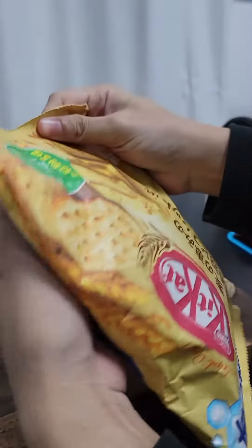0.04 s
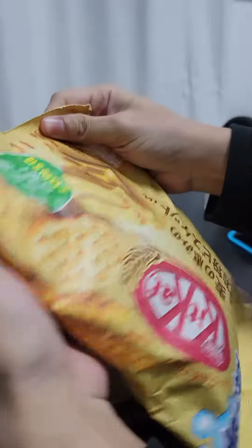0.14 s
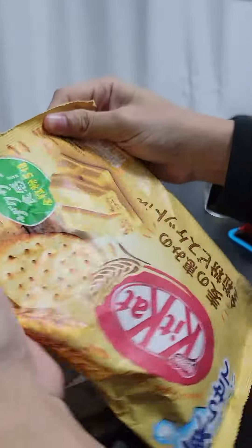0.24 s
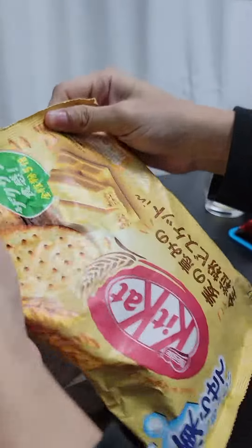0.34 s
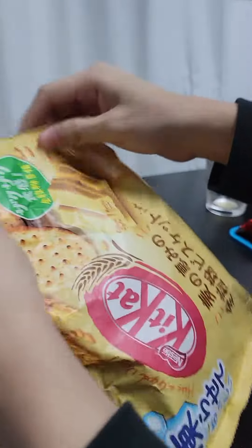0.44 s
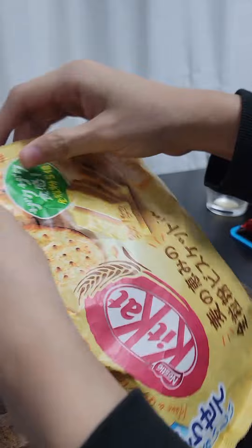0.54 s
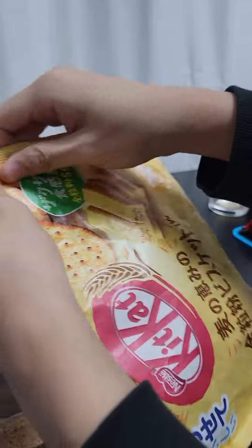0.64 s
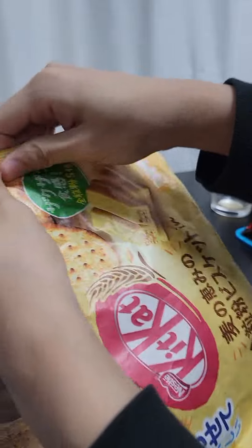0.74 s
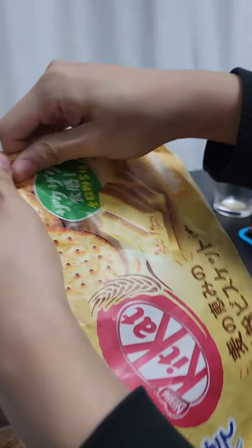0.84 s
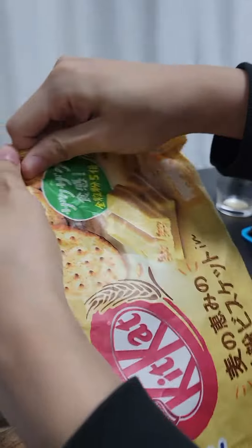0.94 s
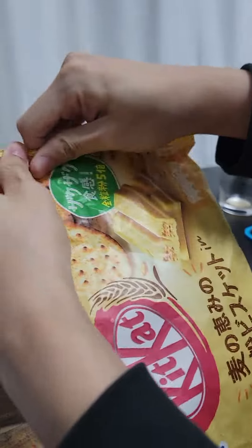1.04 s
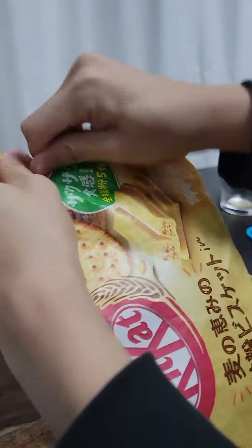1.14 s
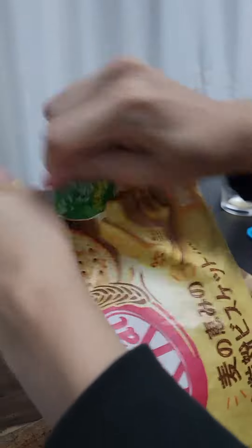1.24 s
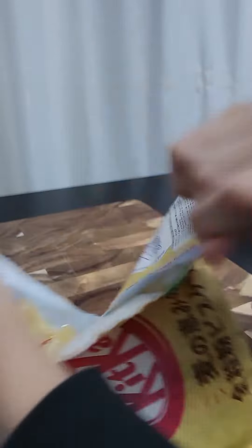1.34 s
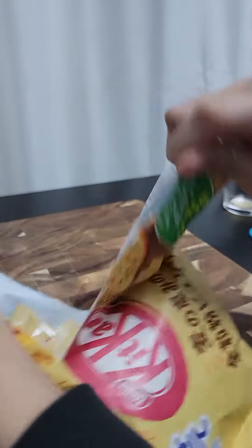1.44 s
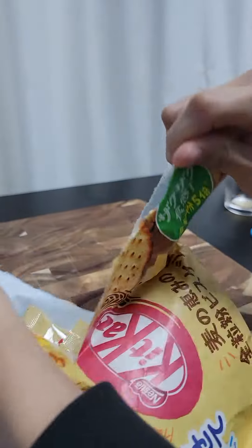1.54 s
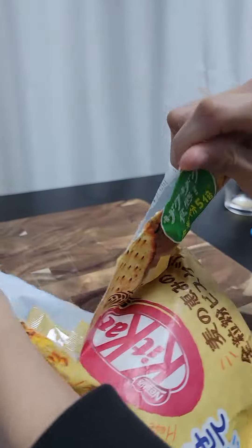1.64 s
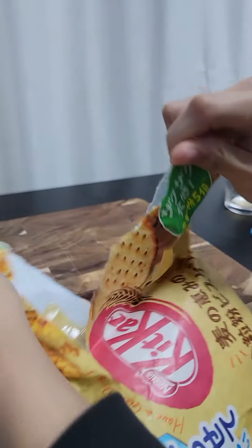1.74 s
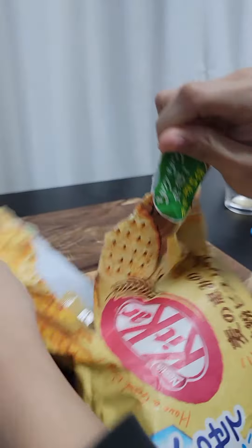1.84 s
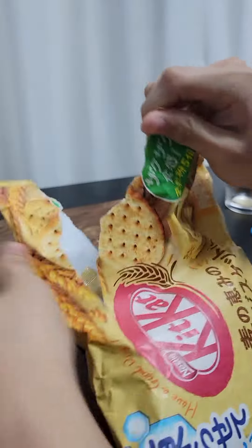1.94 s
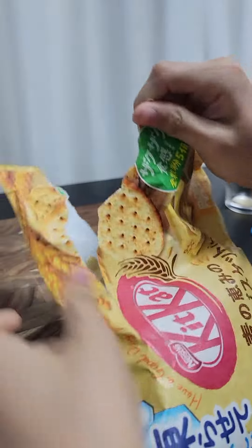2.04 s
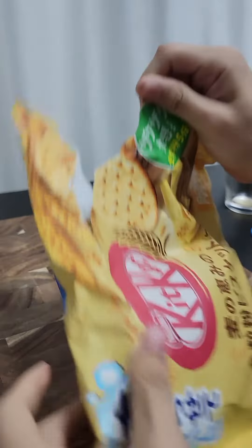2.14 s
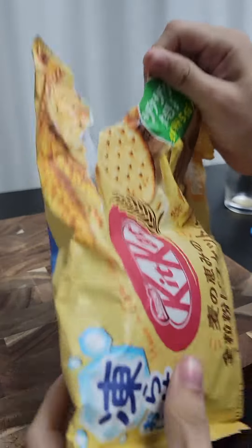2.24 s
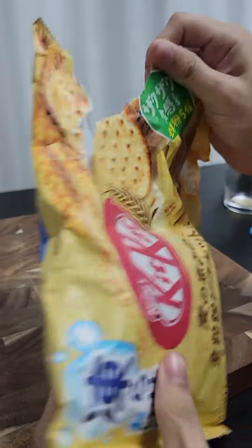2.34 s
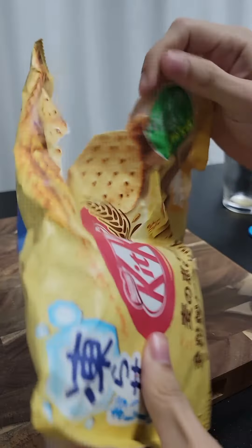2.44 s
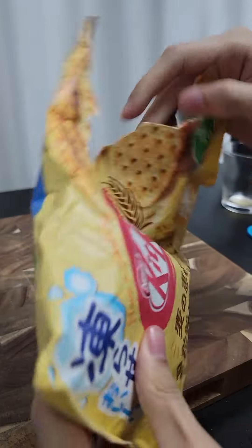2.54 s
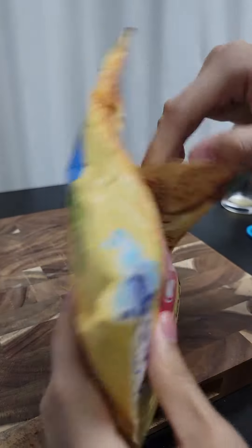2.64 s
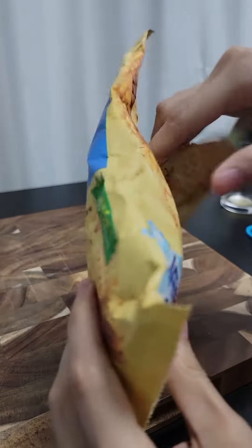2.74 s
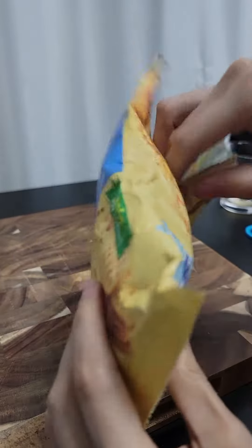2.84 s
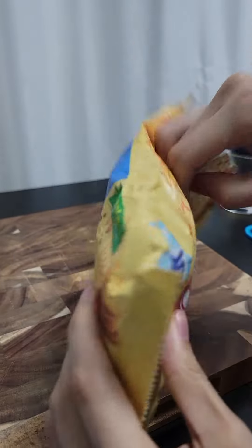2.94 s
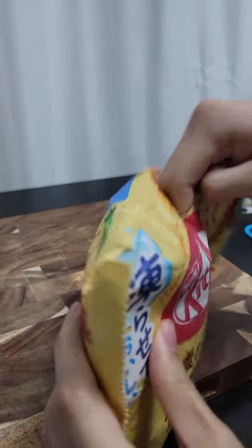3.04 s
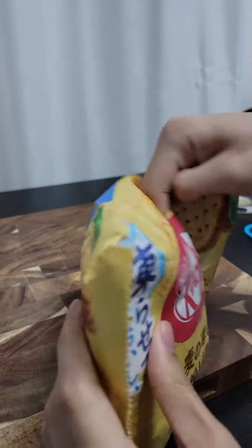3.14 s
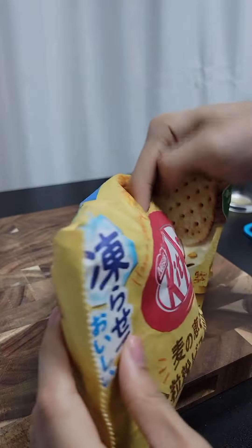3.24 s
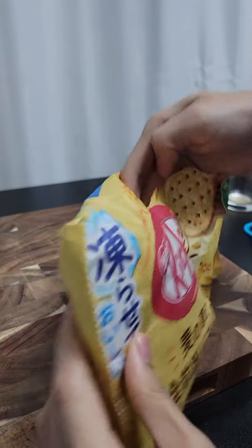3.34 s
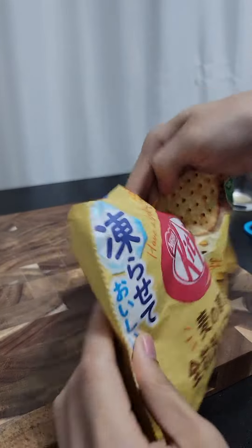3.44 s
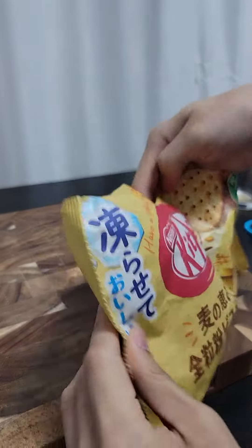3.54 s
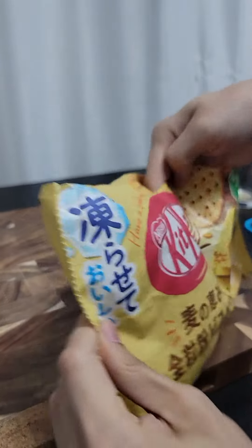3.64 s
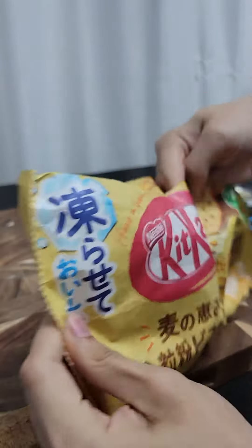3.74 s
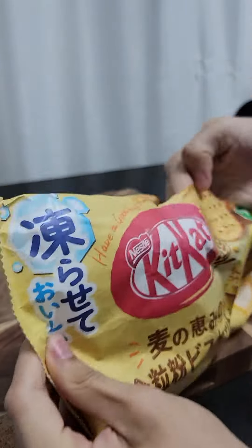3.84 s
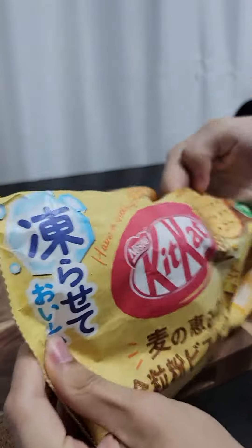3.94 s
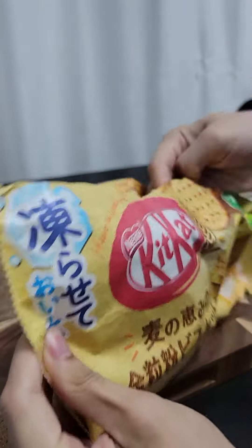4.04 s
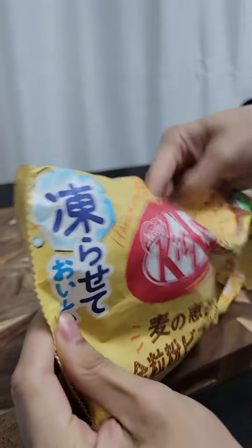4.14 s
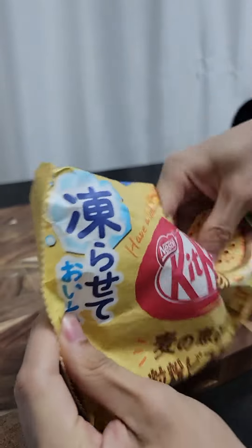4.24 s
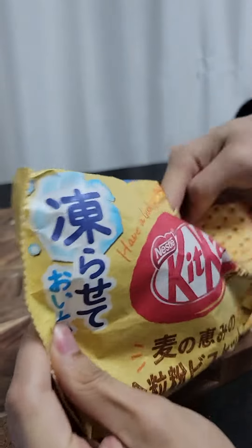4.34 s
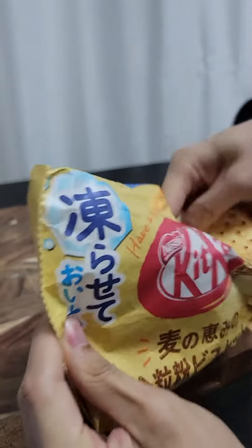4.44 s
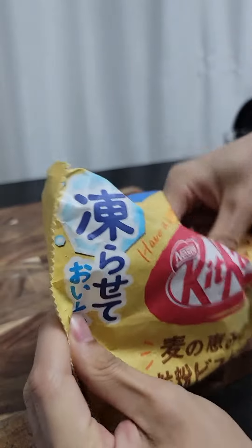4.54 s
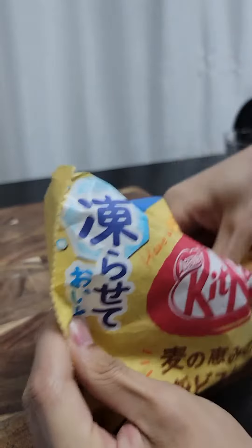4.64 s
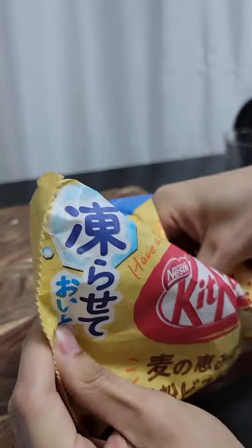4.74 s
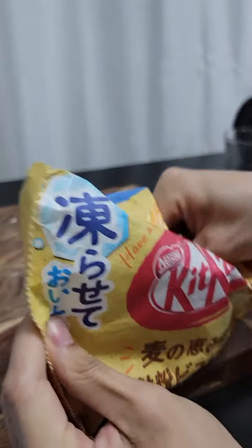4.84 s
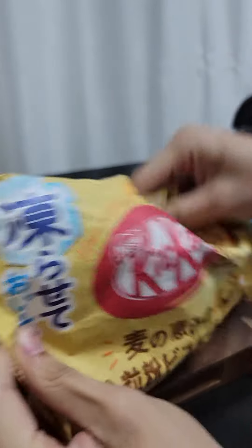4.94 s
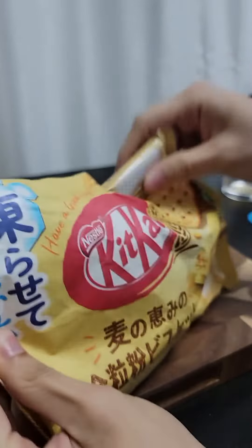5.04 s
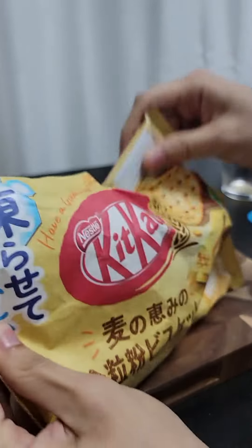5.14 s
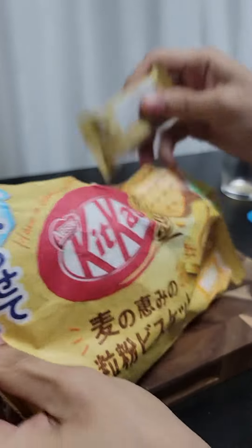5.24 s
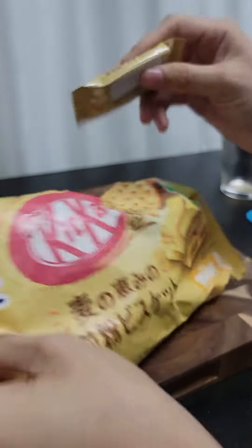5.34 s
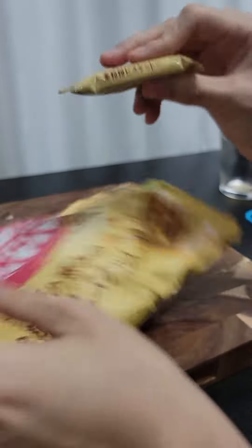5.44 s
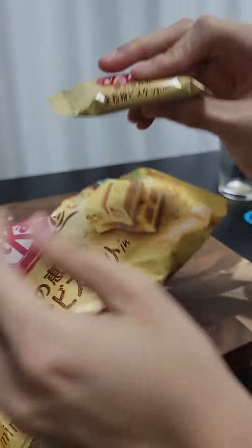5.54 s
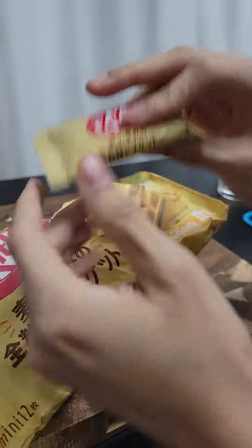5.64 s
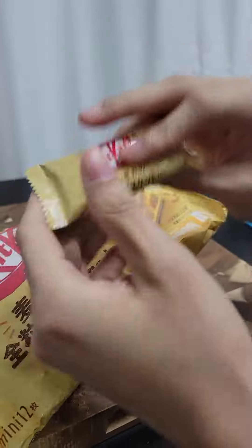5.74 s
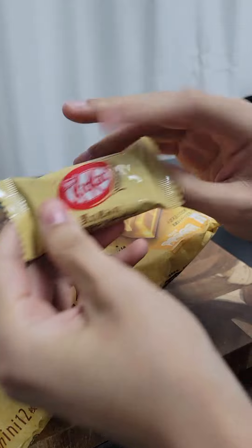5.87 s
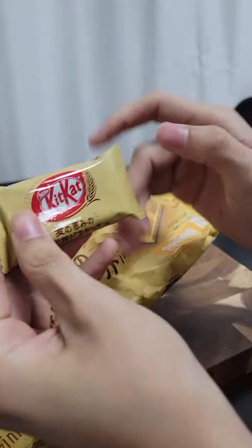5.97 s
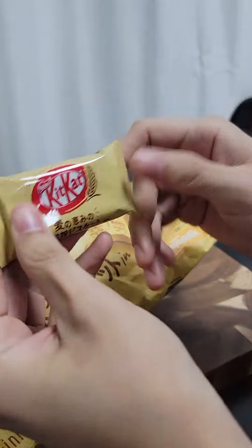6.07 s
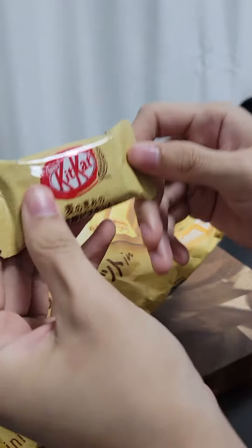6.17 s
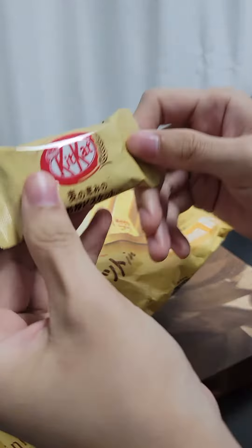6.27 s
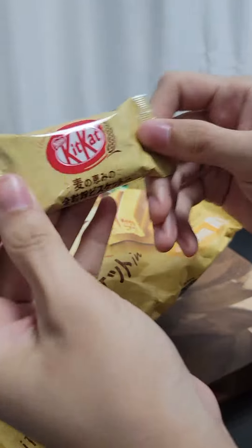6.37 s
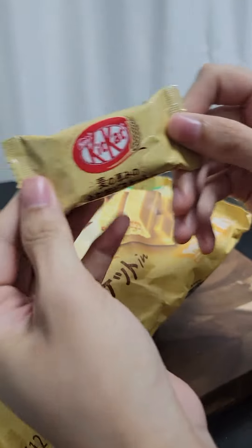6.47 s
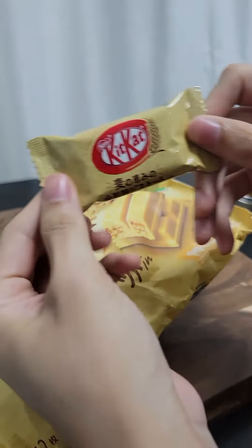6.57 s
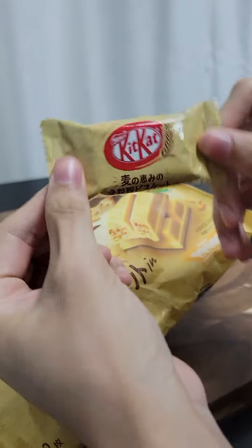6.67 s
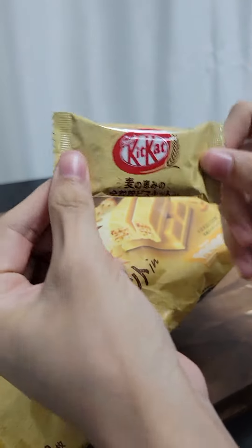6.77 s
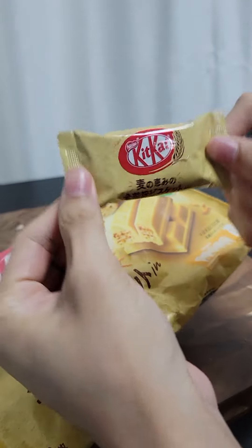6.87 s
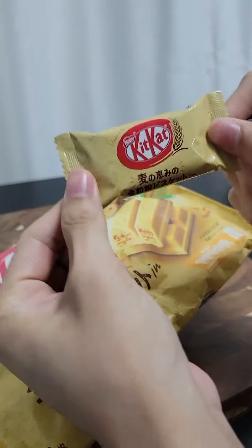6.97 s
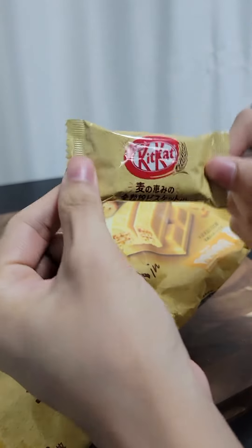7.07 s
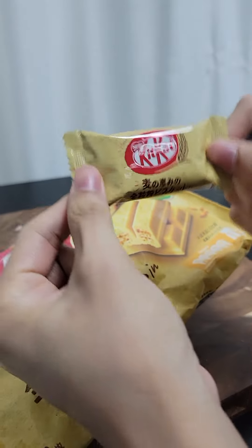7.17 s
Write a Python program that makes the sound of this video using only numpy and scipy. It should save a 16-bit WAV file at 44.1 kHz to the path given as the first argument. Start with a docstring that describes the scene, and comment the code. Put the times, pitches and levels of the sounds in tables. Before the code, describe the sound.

Hands handle a puffy film bag over a table: faint dry sliding and sparse crinkles, a run of evenly spaced snaps growing louder, then a violent ripping crack with a low thump. Loose film rustles gently, then crackles strongly as fingers dig around. The bag is dropped with a dull bump, and a small wrapped bar crinkles crisply and thinly. Close stereo pickup, short room reflections, low hum beneath.

```python
"""Snack bag ripped open

Hands rip open a plastic snack bag over a table, close to a phone, then rummage in it and turn over a small wrapped bar.
Creases in the film buckle one by one (snaps) or in swarms of kicked and rubbed facets (rustle, rip).
The bag thuds softly when it is bumped, and fingertips hiss over its film.
A small, quiet room with a low hum answers; peaks past full scale flatten, as in overloaded microphones."""
import sys
import numpy as np
from scipy import signal
from scipy.fft import rfft, irfft
from scipy.io import wavfile
from scipy.ndimage import uniform_filter1d

SR = 44100
rng = np.random.default_rng(int(sys.argv[2]) if len(sys.argv) > 2 else 0)


def output_pcm(signal):
    """Save a mono or channel-first signal as 16-bit PCM at the path in sys.argv[1].

    Samples are clipped to [-1, 1] before scaling.
    """
    pcm = np.clip(np.atleast_2d(signal).T, -1, 1) * 32767
    wavfile.write(sys.argv[1], SR, np.round(pcm).astype(np.int16))


N = 317961
TIME = np.arange(N) / SR
CONTROL_TIME = TIME[::64]  # slower clock for the movements of the hands
TAPS = 1024  # samples in one crease
BINS = np.fft.rfftfreq(TAPS, 1 / SR)

# Spectral colour of a single crease in the bag. Each row: frequency in Hz, relative level in dB.
BAG_FILM = [(60, -32.5), (130, -1), (400, -10), (600, -3), (750, 1), (950, -4.5), (1250, -2), (1700, -8),
            (3800, -6), (7000, -10.5), (10900, -22.5), (14500, -12.5), (16000, -26)]
# Spectral colour of massed rustling film. Each row: frequency in Hz, relative level in dB.
RUSTLE_COLOUR = [(50, -34.5), (120, 7.5), (330, -7), (430, -11), (740, 2), (980, -5.5), (1200, -1.5),
                 (1700, -2.5), (3600, -3.5), (7000, -8.5), (8500, -13.5), (11000, -21), (14400, -13.5),
                 (16000, -18)]


def gain_of(db):
    """Decibels to an amplitude factor."""
    return 10 ** (np.asarray(db) / 20)


def evened(x):
    """Scaled to rms 1."""
    return x / np.sqrt(np.mean(x ** 2) + 1e-20)


def read(points, hz):
    """A table of (Hz, value), interpolated on a log-frequency axis."""
    f, value = np.transpose(points)
    return np.interp(np.log(hz + 1), np.log(f + 1), value)


def add(mix, s, sound):
    """Mixes a sound in at time s, in seconds."""
    part = mix[:, max(round(s * SR), 0):][:, :sound.shape[-1]]
    part += sound[..., :part.shape[1]]


def panned(db):
    """Left and right gains of constant power; positive dB favours the left."""
    return evened(gain_of([[db / 2], [-db / 2]]))


def causal(gain):
    """The minimum-phase spectrum with this gain: it starts at once and then rings out."""
    log_gain = np.log(np.maximum(gain / gain.max(), 1e-5))
    circle = np.concatenate([log_gain, log_gain[-2:0:-1]])
    return np.exp(np.conj(signal.hilbert(circle)))[:len(gain)]


def stroke_power(rows, attack_s, release_s, sag_db):
    """Power of each stroke over time: it swells up to its start, holds with a steady drift in level, and dies away."""
    start, length, db = np.transpose(rows)[:3, :, None]
    t = CONTROL_TIME - start
    edges = np.minimum(np.minimum(t / attack_s, (length - t) / release_s), 0)
    level = gain_of(db - sag_db * np.clip(t / length, 0, 1))
    return (level * np.exp(edges)) ** 2


def effort(rows, attack_s, release_s, sag_db, held=((0, -100),), held_bright_db=0):
    """Strokes on top of a held level, as (s, level dB, brightness dB); stronger strokes weigh more in the brightness."""
    power = stroke_power(rows, attack_s, release_s, sag_db)
    rest = gain_of(np.interp(CONTROL_TIME, *np.transpose(held))) ** 2
    total = power.sum(0) + rest
    bright_db = (np.transpose(rows)[3] @ power + held_bright_db * rest) / total
    work = np.transpose([CONTROL_TIME, 10 * np.log10(total), bright_db])
    return work[total > 1e-9]


def crease(film, hz, octaves, flutter, flutter_s, lag_s, rise_s=0.000069):
    """One facet of film starts to give, flips, then flutters as the bend spreads; it reaches one microphone first."""
    flip = 60  # sample of the flip
    t = (np.arange(TAPS) - flip) / SR
    swell = evened(np.exp(np.minimum(t / rise_s, -t / flutter_s))) / np.sqrt(TAPS)
    shared, left, right = rng.standard_normal((3, TAPS)) * swell
    same = 1 / (1 + (BINS / 900) ** 2)  # long waves reach both microphones alike
    shake = same * rfft(shared) + np.sqrt(1 - same ** 2) * rfft(np.array([left, right]))
    kick = rng.choice([-1, 1]) * rfft(t == 0)
    facet = (1 + (np.log2((BINS + 1) / hz) / octaves) ** 2) ** (-3 / 4)
    colour = causal(gain_of(read(film, BINS)) * facet)
    late_samples = np.round(np.maximum([[-lag_s], [lag_s]], 0) * SR)
    delay = np.exp(-2j * np.pi * BINS * late_samples / SR)
    wave = irfft((kick + flutter * shake) * colour * delay)
    return wave / np.sqrt((wave ** 2).sum(1, keepdims=True))


def snaps(rows, film, level_db, flutter, flutter_s, rise_s, width, lag_s):
    """Single creases, each with the energy of 5 ms at its level; the nearer microphone is louder and earlier."""
    out = np.zeros((2, N))
    for s, db, hz, octaves, side_db in rows:
        size = (2000 / hz) ** 0.7  # large, low facets move slowly; small ones are crisp
        lag = lag_s * np.tanh(side_db / 3)
        wave = crease(film, hz, octaves * width, flutter, flutter_s * size, lag, rise_s * size)
        add(out, s - .001, gain_of(db + level_db) * panned(side_db) * wave * np.sqrt(SR / 200))
    return out


def crackle(work, film, per_s, spread_db, rub, wander_db, octaves, flutter_s, side_db, count=52):
    """Facets of film are kicked by small creases and rubbed by sliding skin; which ones answer shifts as it folds."""
    s, db, bright_db = np.transpose(work)
    t = np.arange(max(s[0], 0), s[-1], 1 / SR)
    folds = np.arange(t[0], t[-1] + .1, 1 / 30)
    lags = rng.permutation(np.linspace(-1, 1, count)) * .00042
    grip = gain_of(0.087 * (np.interp(t, s, db) - db.max()))  # a harder grip creases more against the rub
    swarm = np.zeros((2, len(t)))
    for hz, lag_s in zip(np.geomspace(250, 16000, count), lags):
        chance = rng.random(len(t)) * count * SR / per_s
        at = np.flatnonzero(chance < 1)
        kicks = np.zeros(len(t))
        kicks[at] = gain_of(spread_db * np.minimum(-np.log(chance[at]), 4)) * (-1) ** at  # few are big
        loose = np.interp(t, folds, gain_of(wander_db * rng.standard_normal(len(folds))))
        drive = (grip * evened(kicks) + rub * rng.standard_normal(len(t))) * loose
        facet = crease([(20, 0)], hz, octaves, 1.64, flutter_s, lag_s)  # uncoloured film
        swarm += np.sqrt(hz) * signal.oaconvolve(drive[None], facet, axes=1)[:, :len(t)]
    colour = irfft(causal(gain_of(read(film, BINS))))
    swarm = signal.oaconvolve(swarm, colour[None], axes=1)[:, :len(t)]
    dull = signal.lfilter(*signal.butter(1, 2600, fs=SR), swarm)
    tilt = gain_of(np.interp(t, s, bright_db) * 0.69)  # brighter strokes gain treble and lose bass
    swarm = dull / tilt + (swarm - dull) * tilt
    power = (swarm ** 2).mean(0)
    power = uniform_filter1d(uniform_filter1d(power, size=1200), size=1200)
    steady = swarm / np.sqrt(abs(power) + 1e-9)  # so that the hands set the mean power
    out = np.zeros((2, N))
    add(out, t[0], steady * gain_of(np.interp(t, s, db)) * panned(side_db))
    return out


def room_tone(level_db, hum_hz, hum_width_hz, hum_db):
    """Steady rumble and faint hiss from coloured noise, with the wavering low hum of some appliance."""
    # Each row: frequency in Hz, relative level in dB.
    tone_colour = [(15, -27.5), (30, -19.5), (45, 3.5), (62, -3.5), (100, -6.5), (150, -9), (185, -9),
                   (300, -12.5), (370, -24.5), (750, -29.5), (1200, -30), (4500, -42), (8000, -58.5),
                   (16000, -61)]
    # Each row: frequency in Hz, left-right likeness from 0 to 1.
    likeness = [(40, 0.55), (150, 1), (400, 0), (1000, 0), (16000, 0)]
    hz = np.fft.rfftfreq(N, 1 / SR)
    a, b, c = rfft(rng.standard_normal((3, N)))
    same = np.clip(read(likeness, hz), -1, 1)
    pair = np.array([a, same * a + np.sqrt(1 - same ** 2) * b])
    air = irfft(pair * gain_of(read(tone_colour, hz)), N)
    hum = irfft(c / (1 + ((hz - hum_hz) / hum_width_hz) ** 2), N)
    return gain_of(level_db) * evened(air) + gain_of(hum_db) * evened(hum)


def room(x, corner_db, tail_db):
    """Early echoes, a few ringing resonances, then a soft tail that fades at its own rate in each band."""
    # Seconds for each band to fall 60 dB. Each row: frequency in Hz, decay in seconds.
    decay = [(150, .35), (800, 0.1), (3000, 0.22), (8000, 0.1), (15000, 0.18)]
    # Off the table, the hands and the curtain. Each row: delay to left in s, delay to right in s, level in dB.
    echoes = [(.0017, 0.0027, -26.5), (.0034, 0.0027, -23), (.0052, 0.0066, -19), (.0086, .0082, -16.5)]
    # Resonances of the corner around the table. Each row: frequency in Hz, width in Hz, dB before corner_db.
    corner = [(191, 15, -2.5), (222.4, 11, -10), (530, 24, 4), (613, 7.6, -20), (710, 50, -3.5),
              (846.6, 79, 1), (1210, 10, -5.5), (1363, 11, -8), (1570, 15, -10.5), (1800, 40, -10)]
    t = np.arange(SR // 2) / SR
    sparse = rng.random((2, len(t))) < 3000 / SR  # 3000 reflections a second
    taps = rng.choice([-1., 1.], (2, len(t))) * sparse * (t > .008)
    hz, when, z = signal.stft(taps, SR, nperseg=256)
    fade = gain_of(-60 * when / read(decay, hz)[:, None])
    tail = signal.istft(z * fade, SR, nperseg=256)[1]
    response = gain_of(tail_db) * tail / np.linalg.norm(tail[0])
    for left_s, right_s, db in echoes:
        response[[0, 1], [int(left_s * SR), int(right_s * SR)]] += gain_of(db)
    for hz, width, db in corner:
        ring = np.exp(-np.pi * width * t) * np.cos(2 * np.pi * hz * t)
        add(response, 0, gain_of(db + corner_db) * 2 * np.pi * width / SR * ring)
    return signal.fftconvolve(x, response, axes=1)[:, :N]


def glide():
    """Dry fingertips slide without creasing the film: an even, airy hiss of coloured noise."""
    # Each row: start in seconds, length in seconds, level in dB.
    slides = [(0.0, 0.16, -43), (.16, 0.25, -51), (.43, .12, -51), (.79, 0.052, -60)]
    # Each row: frequency in Hz, relative level in dB.
    glide_colour = [(500, -12.5), (3000, -8), (6500, -1), (8500, -7.5), (11000, -8.5), (14500, -3),
                    (16000, -1)]
    gain = gain_of(read(glide_colour, np.fft.rfftfreq(N, 1 / SR)))
    hiss = irfft(rfft(rng.standard_normal((2, N))) * gain, N)
    power = stroke_power(slides, attack_s=0.038, release_s=.04, sag_db=-2.5).sum(0)  # each slide grows a little
    return evened(hiss) * np.sqrt(np.interp(TIME, CONTROL_TIME, power))


def thuds():
    """Soft bumps on the air-filled bag: its cushion of air swings briefly, as a sine that swells and fades."""
    # Each row: start in seconds, envelope peak in dB, pitch in Hz, swell and fade time constant in seconds.
    bumps = [(0.176, -38, 104, 0.01), (1.181, -27, 194, 0.017), (1.215, -23, 86.6, 0.011),
             (1.25, -18.5, 191, 0.0082), (2.326, -42.5, 87, 0.0076), (2.715, -29, 252, 0.0046),
             (2.883, -34, 152, 0.0045), (3.336, -30.5, 155.7, 0.0038), (4.107, -29, 134, 0.0031),
             (4.198, -37, 239, 0.003), (4.503, -34, 362, 0.0089), (4.684, -31, 246, 0.0026),
             (4.888, -36, 350, 0.0077), (5.444, -21.5, 247, 0.0038), (5.452, -26, 96, 0.0029)]
    out, t = np.zeros((2, N)), np.arange(SR // 8) / SR
    for s, db, hz, fade_s in bumps:
        envelope = t / fade_s * np.exp(1 - t / fade_s)
        add(out, s, gain_of(db) * envelope * np.sin(2 * np.pi * hz * t))
    return out


def wrapper():
    """Fingers squeeze and turn the small, stiff wrapper: crisp snaps over a fine crackle and a duller rustle."""
    # Each row: start in seconds, length in seconds, level in dB, brightness in dB before scaling.
    squeezes = [(5.63, 0.017, -50, -10), (5.735, 0.11, -36, 0), (6.034, 0.044, -38.5, 2.5),
                (6.11, 0.0065, -39, -1), (6.195, 0.017, -32.5, 5), (6.266, 0.0077, -25.5, 14),
                (6.355, 0.047, -51, -10), (6.555, 0.099, -52, -5), (6.695, 0.015, -42, 8),
                (6.79, 0.065, -50.5, 4), (6.87, 0.054, -65.5, -5), (7.19, .02, -53.5, -2.5)]
    # Each row: time in seconds, dB before level_db, centre in Hz, octaves before width, left-right dB.
    stiff_creases = [(5.3386, -21, 5640, 1.3, -7), (5.6291, -36, 2710, 0.3, -6),
                     (5.6511, -25.5, 3760, 0.4, -7), (5.7024, -25.5, 1980, 0.67, -4.5),
                     (5.7334, -22, 3580, 4.4, -1.5), (5.7455, -21, 4210, 1.4, -1.5),
                     (5.7734, -24.5, 4430, 1.4, -0.5), (5.8207, -34, 4210, 1.5, -7),
                     (5.8521, -30, 1480, 2.9, -2), (6.1034, -26, 5820, 0.5, -0.5),
                     (6.1108, -24.5, 4970, 1.8, -0.5), (6.141, -32, 4570, 0.67, -3.5),
                     (6.1971, -27, 3300, 1.1, -0.5), (6.2093, -23.5, 4760, 1.1, 0),
                     (6.2339, -27, 4960, 0.66, -6), (6.2651, -20, 6600, 1.1, -0.5),
                     (6.27, -17.5, 4870, 0.29, -11), (6.2767, -15.5, 5000, 1.4, -2),
                     (6.3214, -33.5, 6360, 1.1, 0), (6.3571, -27.5, 4530, 0.66, -1.5),
                     (6.3746, -31, 4140, 2.3, -1), (6.5481, -32.5, 5390, 0.9, -3),
                     (6.5644, -32.5, 2120, 0.79, 4), (6.7164, -33, 2710, 3.3, -2),
                     (6.7675, -39, 2000, 1.8, 0), (6.7828, -30.5, 3500, 1.6, -1),
                     (6.8407, -35, 7300, 2.4, -3.5), (7.1028, -49.5, 4500, 1.2, -6),
                     (7.1819, -38, 4500, 0.32, -3.5)]
    # Colour of its snaps. Each row: frequency in Hz, relative level in dB.
    snap_colour = [(200, -16), (800, -2.5), (2000, -2), (3800, -3.5), (5500, 7), (8500, -5), (11000, -7),
                   (14500, -8), (16000, -5)]
    # Colour of its fine crackle. Each row: frequency in Hz, relative level in dB.
    fine_colour = [(200, -64), (2000, -22), (4000, -8), (5200, 6), (6200, 7.5), (7600, -3), (11000, -16),
                   (14500, -17), (16000, -17)]
    work = effort(squeezes, attack_s=.006, release_s=0.0097, sag_db=2.0)
    sound = snaps(stiff_creases, snap_colour, level_db=-1.75, flutter=5.9, flutter_s=0.0025,
                  rise_s=0.00032, width=0.9, lag_s=.00015)
    sound += crackle(work, fine_colour, per_s=350, spread_db=4.0, rub=0.05, wander_db=3,
                     octaves=0.16, flutter_s=0.0016, side_db=-6.0)
    dull = crackle(work, RUSTLE_COLOUR, per_s=350, spread_db=4.0, rub=0.22, wander_db=5,
                   octaves=0.53, flutter_s=0.0025, side_db=2)
    return sound + gain_of(-4.5) * dull


def stray_creases(work, over_db, spread_db, centre_hz, scatter_octaves, octaves, side_db, count=110):
    """Rows of snaps: lesser creases pop at random, at levels that follow the rustle of the moment."""
    s, db, _ = np.transpose(work)
    when = s[0] + (np.arange(count) + rng.random(count)) / count * (s[-1] - s[0])
    size, pitch, side = rng.uniform(-1.2, 1, (count, 3)).T
    level_db = np.interp(when, s, db) + over_db + spread_db * size
    hz = centre_hz * 2 ** (scatter_octaves * pitch)
    return np.transpose([when, level_db, hz, np.full(count, octaves), side_db + 5 * side])


def bag():
    """Each push or pull of a hand crumples the bag: a rustle of many facets, with single creases popping out."""
    # Each row: start in seconds, length in seconds, level in dB, brightness in dB before scaling.
    crumples = [(0.0, 0.033, -34.5, -17), (.125, 0.11, -40.5, -6), (.315, .025, -48.5, 3),
                (.42, 0.097, -41, -6), (.552, 0.027, -41.5, -7), (.6, 0.056, -49.5, -2),
                (.745, 0.14, -43, -5), (1.525, 0.048, -48.5, -17), (1.63, 0.19, -43, -3),
                (1.8, 0.07, -41.5, -8), (2.156, .049, -34.5, -5), (2.334, 0.11, -38, -4.5),
                (2.494, 0.1, -39.5, 3.5), (2.635, 0.08, -35, 0), (2.772, 0.0095, -37.5, 10),
                (2.909, 0.043, -26.5, 1), (3.0, 0.022, -29, -6.5), (3.082, 0.0072, -28.5, -8),
                (3.145, 0.033, -35, -4), (3.355, 0.062, -26, 1), (3.52, 0.4, -33, -4),
                (3.68, 0.075, -22, -1), (3.782, .05, -32, 5), (3.934, .074, -32, 13),
                (4.065, .02, -33.5, -6), (4.122, 0.027, -22, 0), (4.212, 0.055, -25.5, -2),
                (4.365, 0.14, -31.5, -1.5), (4.462, .1, -24, 3.5), (4.603, 0.056, -27.5, 1.5),
                (4.68, 0.11, -26, 3.5), (4.855, 0.13, -31, 2.5), (4.959, 0.093, -26.5, 1),
                (5.117, 0.047, -35.5, -2), (5.447, 0.017, -26, -8), (5.543, 0.012, -34.5, -0.5),
                (6.8, 0.14, -47, -49), (6.977, 0.0099, -42, -10)]
    # Faint rustle between strokes, as the bag is held, searched and put down. Each row: time in seconds, level in dB.
    held = [(0, -56.5), (1.05, -53.5), (1.5, -62), (2.06, -56.5), (2.25, -43), (2.85, -44.5), (3.2, -41),
            (4.6, -38), (5.3, -43), (5.6, -54), (5.95, -65), (6.6, -66.5), (7.2, -62)]
    # Each row: time in seconds, dB before level_db, centre in Hz, octaves before width, left-right dB.
    loud_creases = [(0.02, -30, 780, 0.73, 0.5), (0.0564, -27.5, 2280, 1.1, 1),
                    (0.1501, -27.5, 1210, 2, -2.5), (0.445, -29, 1400, 3, -0.5),
                    (0.559, -33, 888, 0.71, -1), (0.6405, -34, 2400, 5.3, -3),
                    (0.7094, -30, 1550, 1.1, -2.5), (0.767, -34, 3020, 0.82, -10),
                    (0.8106, -31.5, 1020, 2.2, -3.5), (1.1096, -24.5, 1405, 0.7, 0.5),
                    (1.1239, -16.5, 2600, 2.4, 3), (1.1318, -15, 2230, 5.6, 1.5),
                    (1.3376, -19, 2585, 1.3, -15), (1.3802, -23.5, 6530, 3.2, -4),
                    (1.4208, -23.5, 2980, 0.67, -1.5), (1.4559, -32, 940, 2.1, 2.5),
                    (1.4761, -33.5, 3150, 2.5, -4), (1.7336, -30, 1450, 0.8, -4),
                    (1.8071, -32, 1800, 1.6, -9), (1.8318, -29.5, 2400, 1.8, -1),
                    (1.9, -28, 1000, 0.47, -1), (1.9002, -21.5, 2560, 0.27, -1.5),
                    (2.0675, -29.5, 2170, 1.2, 1.5), (2.1413, -32, 1750, 0.45, -1.5),
                    (2.1972, -28, 700, 1.8, -7), (2.4249, -22, 2110, 0.65, -6),
                    (2.4994, -26.5, 1950, 2.4, 1.5), (2.6414, -21.5, 1730, 3.2, 1.5),
                    (2.7221, -29.5, 3010, 4.2, -2), (2.7649, -30.5, 1170, 0.56, 1.5),
                    (2.8998, -21, 3170, 1.6, -6), (2.923, -26.5, 3980, 0.73, -1.5),
                    (2.9574, -22.5, 2100, 1.5, 0.5), (2.9935, -21.5, 2540, 2, -6.5),
                    (3.0907, -24.5, 1480, 0.8, -7), (3.1003, -19, 2490, 2.4, -2.5),
                    (3.1325, -18.5, 2600, 0.76, -1.5), (3.1838, -22.5, 910, 1.05, 0),
                    (3.257, -26, 1800, 1.5, -2.5), (3.2963, -24, 1120, 3.5, -2),
                    (3.3407, -14, 1230, 1.6, -3), (3.3816, -14.5, 2160, 5.4, -4.5),
                    (3.4261, -25.5, 1210, 1.2, 1), (3.6238, -20, 2740, 2.3, -4),
                    (3.6818, -17, 775, 0.59, -1), (3.7157, -14.5, 2610, 1.1, -1),
                    (3.727, -13.5, 1230, 3.3, -2), (3.7448, -16.5, 4350, 0.99, -2),
                    (3.7961, -19.5, 1470, 1.2, -9), (3.8341, -19.5, 3460, 2.5, 0),
                    (3.8881, -32, 1270, 0.4, -9), (4.0511, -19, 6720, 1.5, 3.5),
                    (4.1104, -12.5, 1680, 1.3, -1), (4.1318, -13, 3830, 2.3, -5.5),
                    (4.202, -12, 2600, 2.9, -1), (4.254, -27, 1020, 0.74, -2),
                    (4.2918, -24, 3300, 2.5, -3.5), (4.427, -20.5, 6750, 1.6, -5.5),
                    (4.4554, -10, 2740, 1.36, -0.5), (4.5123, -12, 1440, 1.6, 5.5),
                    (4.551, -19, 3180, 0.68, -12), (4.6412, -12, 1390, 2, -7),
                    (4.6734, -18, 5280, 1.2, -1.5), (4.6867, -14.5, 3230, 3.8, -2),
                    (4.718, -14.5, 7000, 3, -3.5), (4.7821, -19.5, 3510, 0.99, -14),
                    (4.7985, -22.5, 1090, 0.45, -15), (4.8466, -16.5, 4450, 0.6, -3.5),
                    (5.04, -18, 7100, 1.3, 1), (5.2827, -29.5, 2930, 0.51, -5.5),
                    (5.2992, -31, 855, 1.1, -1), (5.3676, -26.5, 1110, 2.5, -4),
                    (5.3951, -19.5, 1770, 0.57, -1), (5.4316, -19, 1070, 4.3, -10),
                    (5.457, -14, 2000, 14, -1.5)]
    work = effort(crumples, attack_s=0.02, release_s=0.02, sag_db=1.5, held=held, held_bright_db=-1)
    strays = stray_creases(work, over_db=1.5, spread_db=4.0, centre_hz=2200, scatter_octaves=0.99,
                           octaves=1.0, side_db=-2.5)
    sound = snaps([*loud_creases, *strays], BAG_FILM, level_db=-2.15, flutter=2.0, flutter_s=0.003,
                  rise_s=0.00055, width=0.62, lag_s=.0003)
    return sound + crackle(work, RUSTLE_COLOUR, per_s=550, spread_db=3.5, rub=0.66, wander_db=4.5,
                           octaves=0.26, flutter_s=0.0028, side_db=-3.0)


def seam_pops(count=8):
    """The seam lets go step by step, in evenly spaced snaps that grow ever louder as the pull grows."""
    last_s, step_s = 1.08, .026
    rows = []
    for k in range(count):  # counted back from the last pop
        db = -22.5 - 6 * np.log2(k + 1)
        rows.append((last_s - k * step_s, db, 800, .7, 3))
    return snaps(rows, BAG_FILM, level_db=-4, flutter=1.3, flutter_s=0.001,
                 rise_s=0.0001, width=0.6, lag_s=.0002)


def rip():
    """The tear runs down the bag in tugs, each a dense swarm of creases."""
    # Each row: start in seconds, length in seconds, level in dB, brightness in dB before scaling.
    tugs = [(1.138, 0.025, -22, 0), (1.161, .011, -13.5, 6), (1.178, 0.062, -9.5, -2.5),
            (1.243, 0.028, -8.5, -0.5), (1.29, 0.054, -21.5, -0.5), (1.36, .055, -32, 0.5)]
    # Each row: frequency in Hz, relative level in dB.
    tear_colour = [(35, -36), (75, 4), (190, -3), (370, -12), (520, -7.5), (760, -0.5), (930, -8),
                   (1200, -4), (2400, -8), (6500, -12.5), (8500, -19), (11000, -25.5), (14800, -14.5),
                   (16000, -25.5)]
    work = effort(tugs, attack_s=.007, release_s=0.022, sag_db=0.5)
    return crackle(work, tear_colour, per_s=2400, spread_db=2.0, rub=0.4, wander_db=2.0,
                   octaves=0.52, flutter_s=0.0041, side_db=-2.0)


def scene():
    """Bag, rip and wrapper, direct and through the room, over the room's own tone."""
    film = glide() + thuds() + wrapper() + bag() + seam_pops() + rip()
    tone = room_tone(level_db=-47.0, hum_hz=47.9, hum_width_hz=1.6, hum_db=-50.5)
    return film + room(film, corner_db=-8.5, tail_db=-20.0) + tone


def record(dry):
    """Peaks past full scale flatten; then a steep low-pass limits the band."""
    flattened = np.clip(dry, -1, 1)
    low_pass = signal.firwin(511, 16200, window=("kaiser", 9), fs=SR)  # cutoff in Hz
    return signal.oaconvolve(flattened, low_pass[None], "same")


dry = scene()
out = record(dry)
output_pcm(out)
```